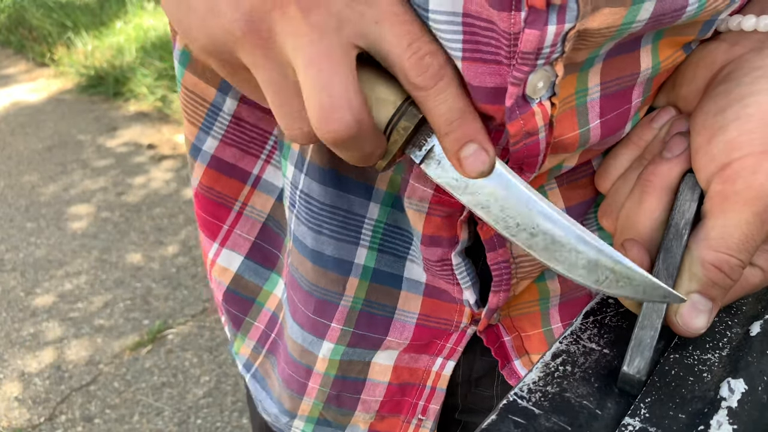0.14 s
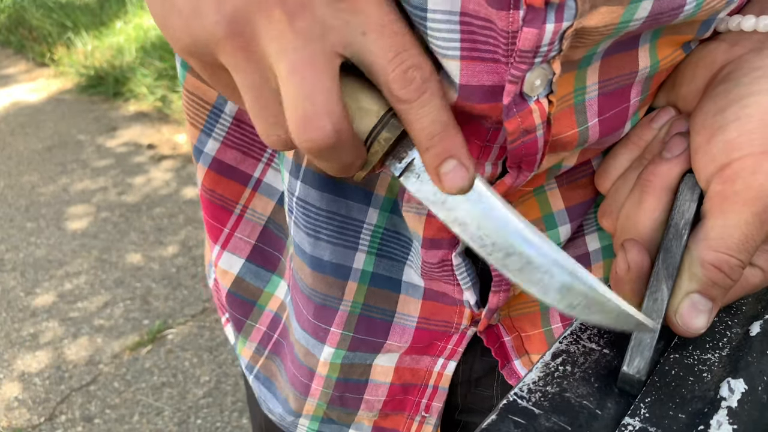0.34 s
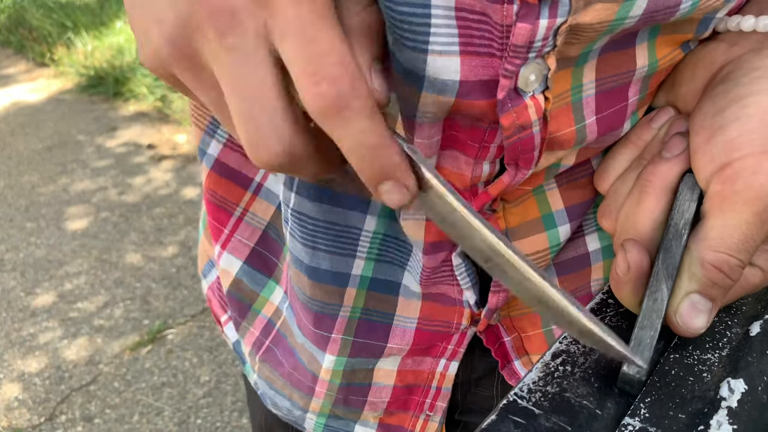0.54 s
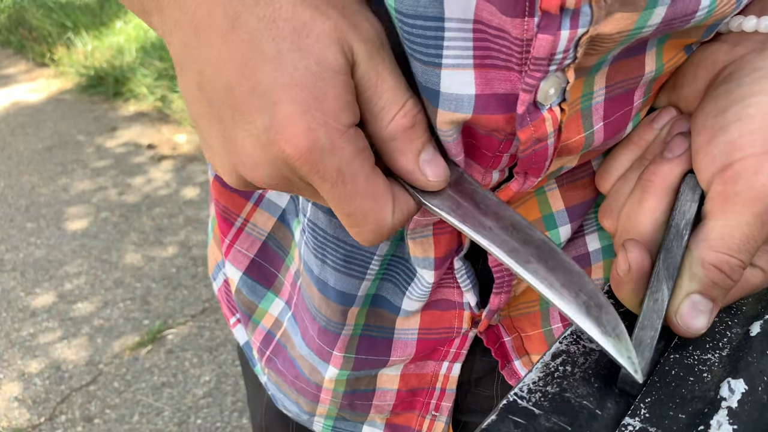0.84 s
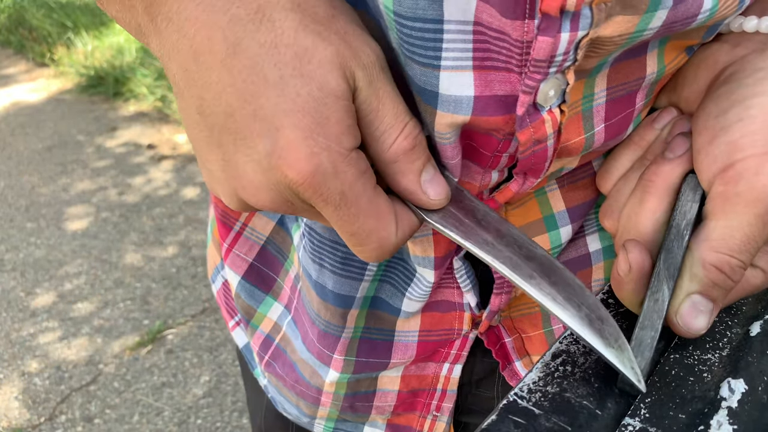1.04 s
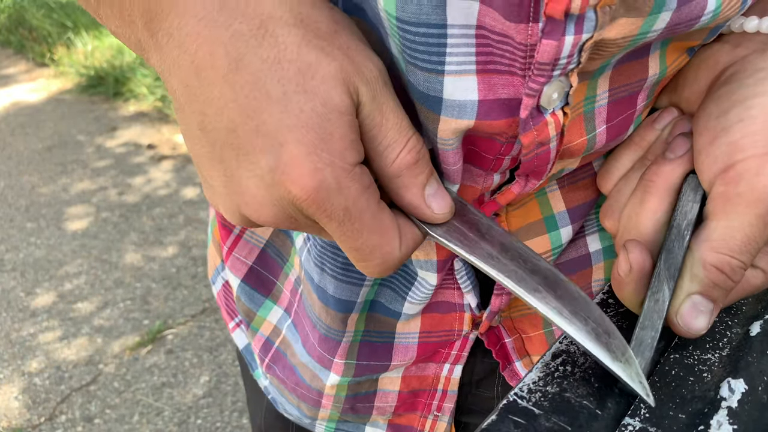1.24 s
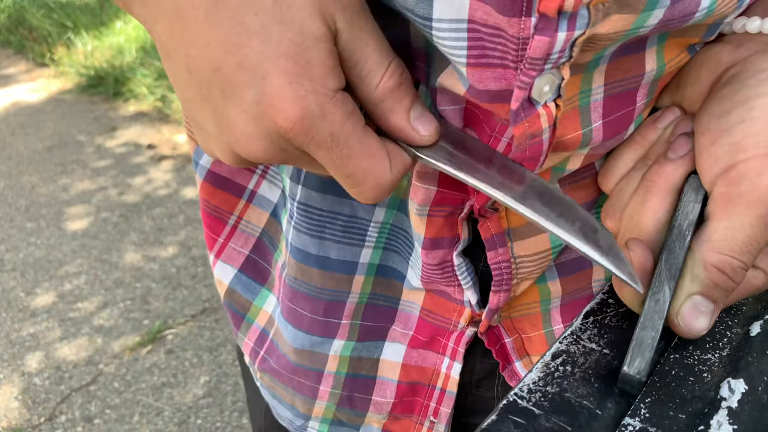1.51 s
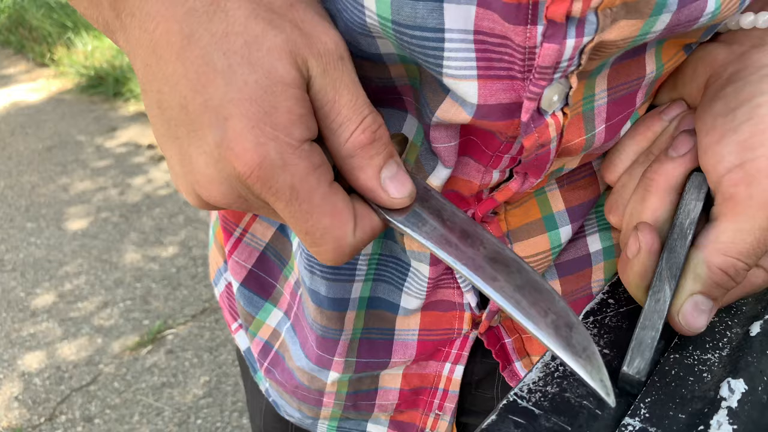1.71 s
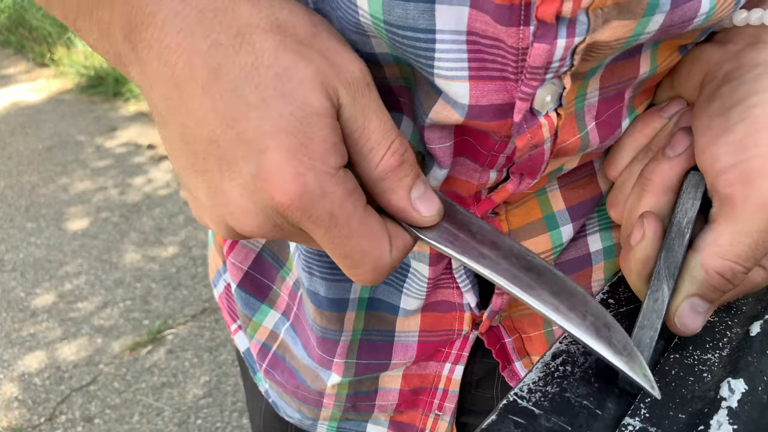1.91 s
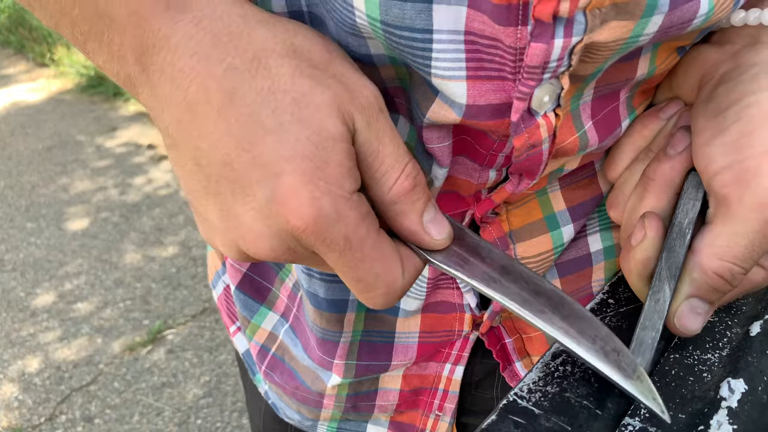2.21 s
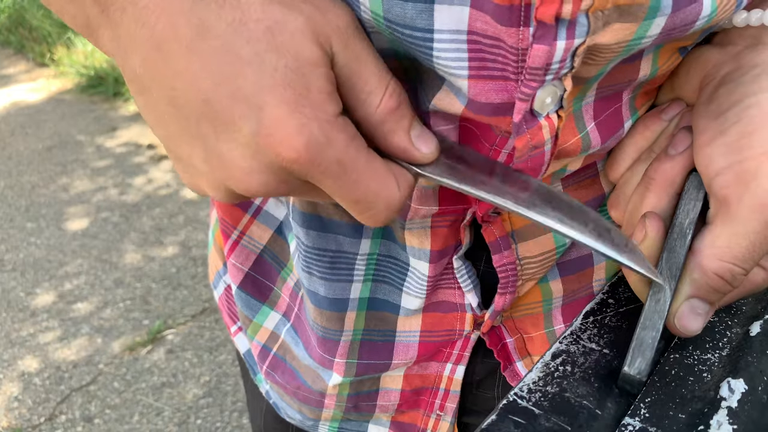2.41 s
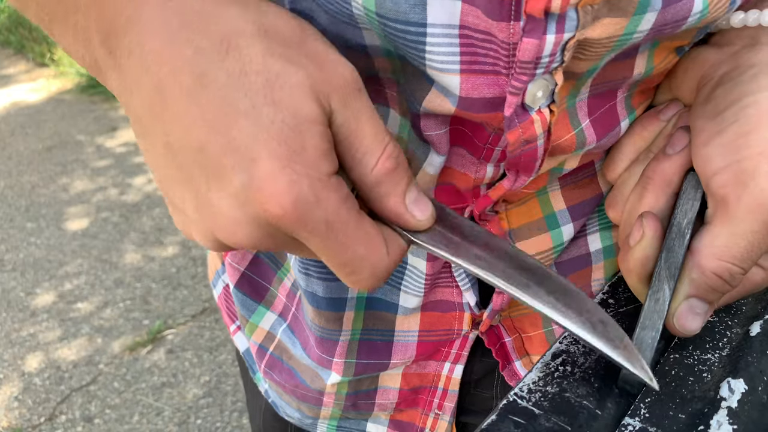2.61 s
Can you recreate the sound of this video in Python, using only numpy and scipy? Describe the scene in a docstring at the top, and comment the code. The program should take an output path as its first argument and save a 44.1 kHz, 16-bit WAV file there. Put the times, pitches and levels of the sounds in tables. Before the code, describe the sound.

A knife is sharpened on a small whetstone: three times the blade lands with a tap, then makes a short, gritty, slightly ringing scrape. Outdoors and close up, wind bumps the microphone over faint hiss and insects.

```python
"""Outdoors at a bench, a hand-held knife is set on a small whetstone with a tap, then pushed along it
in a short, gritty stroke, three times. Steel catching on grain sets blade and stone ringing briefly,
and the bench thuds underneath. Hand or blade brushes faintly and the grip creaks. Behind it sits a
bed of far hiss, motor hum and high, throbbing insects, while wind bumps the microphone."""
import sys
import numpy as np
from scipy import signal
from scipy.fft import rfft, irfft
from scipy.io import wavfile

SR = 44100
rng = np.random.default_rng(int(sys.argv[2]) if len(sys.argv) > 2 else 0)


def wav_out(sig):
    """Save sig, one row per channel (or a flat mono array), as 16-bit PCM at SR to the path in sys.argv[1]."""
    wavfile.write(sys.argv[1], SR, np.round(np.clip(np.atleast_2d(sig).T, -1, 1) * 32767).astype(np.int16))


N = 121275
T = np.arange(N) / SR
SHORT_T = T[:SR // 2]   # time within one contact or echo tail
PRE_ROLL_S = .01

# far hiss, with a silent band cut out at 10-12 kHz: f/Hz, level/dB
AIR_EQ = [(90, -49.5), (150, -2), (220, -13.5), (310, -20.5), (450, -15.5), (650, -22), (950, -28.5),
          (1400, -26.5), (1900, -25), (2350, -21), (2750, -23), (3300, -26.5), (4200, -26.5), (5500, -32),
          (6800, -35.5), (7300, -50), (8300, -8), (9500, -41.5), (10200, -123), (11200, -124), (12200, -84),
          (12900, -39), (14200, -49), (15000, -70), (15600, -65.0)]
# left-right likeness of hiss and wind: f/Hz, likeness/0-1
STEREO_LIKENESS = [(30, 1), (80, 0.84), (290, 0.98), (640, 0.66), (1400, 0.11), (8300, 0), (15000, 0.033)]
# wind rumble on the microphone: t/s, level/dB
RUMBLE_FADER = [(0.0, -50), (0.21, -50), (0.33, -50), (0.64, -52), (0.86, -53), (1.08, -53.5),
                (1.24, -48.5), (1.39, -47.5), (1.65, -51), (2.75, -54.5)]
# its tone: f/Hz, level/dB
RUMBLE_EQ = [(30, -28), (60, 1), (90, -0.5), (150, -8), (300, -19.5), (600, -77.5)]
# the deepest buffeting: t/s, level/dB
BUFFET_FADER = [(0.0, -63), (0.05, -54), (0.16, -57), (0.2, -63), (0.32, -52), (0.37, -82), (0.45, -58),
                (0.49, -64), (0.65, -43), (0.69, -50), (0.73, -45), (0.84, -39.5), (0.87, -44), (0.91, -45),
                (0.94, -40), (0.97, -51), (1.18, -57), (1.25, -41.5), (1.29, -64), (1.37, -42), (1.53, -51),
                (1.56, -43), (1.62, -79), (1.88, -53.5), (1.91, -52), (1.97, -51), (2.0, -53), (2.34, -64),
                (2.35, -50), (2.75, -63.5)]
# its tone: f/Hz, level/dB
BUFFET_EQ = [(10, -11), (28, 12.5), (48, 8), (80, -19), (200, -82)]
# single wind bumps: t/s, level/dB, f/Hz, signed gain
WIND_BUMPS = [(0.719, -30.5, 46.6, -1.1), (0.746, -28.5, 48, -1), (0.802, -23, 70, 0.92),
              (0.875, -29, 115, 0.97), (0.889, -26, 119, 0.59), (0.904, -26.5, 33.8, 0.86),
              (1.246, -32.5, 83.5, -1.26), (1.331, -31.5, 62.5, 1), (1.353, -22.5, 81, 0.98),
              (1.699, -35.5, 61.4, 0.79)]
# modes of blade and stone: f/Hz, level over the grit/dB, t60/s, pan left/dB, left phase lead/rad
BLADE_MODES = [(651, 3, 0.049, 14, 0), (768.7, 5.5, 0.089, -10, -2), (1440.7, 4.5, 0.067, 12.5, 2.5),
               (1575.5, 5, 0.046, -12, 3), (1746, 6.5, 0.047, 12, -1.5), (2180, 2, 0.079, 23.5, -4.5),
               (2314, 3, 0.047, 20.5, -1), (2393, -8, 0.11, 1, 1), (2495, 12, 0.05, 0, 2.5),
               (2633, 6.5, 0.045, 1, 2), (2800, 11.5, 0.052, -7.5, 3), (3466, 7, 0.034, -4, -1.4),
               (4270, 0.5, 0.083, -9, -2.5), (4450, 2, 0.022, 21, -0.1), (4922, 0.5, 0.034, 14.5, 0.23),
               (5510, 5, 0.032, -9, 4.56), (8150, 11.5, 0.035, -18, 0.6), (9260, 11.5, 0.012, -5.5, 1.08),
               (14100, 4, 0.011, -4, 2.5)]
# modes of the bench: f/Hz, relative level/dB, t60/s
BENCH_MODES = [(135.6, 1, 0.18), (185.5, -7.5, 0.19), (229, -5.5, 0.068), (320.6, -19.5, 0.05),
               (405.4, -16, 0.12), (557, -15, 0.15)]
# nearby echoes, band by band: f/Hz, t60/s
ECHO_DECAYS = [(300, 0.33), (800, 0.32), (1600, 0.15), (3000, 0.096), (6000, 0.027), (12000, 0.06)]
# the blade lands on the stone: t/s, level/dB, rattle t60/s, thud/dB, snap/dB, bounce delay/s
BLADE_TAPS = [(0.2036, -24, 0.017, -26, -40, 0.006), (1.152, -30, 0.017, -25.5, -43.5, .005),
              (2.28, -24, .018, -27, -70, 0.00783)]
# tone of the rattle, one curve a tap: f/Hz, level/dB
TAP_EQS = [
    [(150, -43), (300, -22), (420, -16.5), (680, 1), (850, -1.5), (1130, -9.5), (1450, 7.5), (1700, -17),
     (1920, -7.5), (2500, -5), (2800, -9), (3200, -17.5), (4200, -6.5), (5000, -3.5), (6300, -17),
     (7200, -34), (8100, -23), (9250, -21.5), (10300, -34.5), (11700, -44), (13000, -30), (14200, -40),
     (15100, -55), (15700, -67.5)],
    [(150, -22), (300, -2), (420, -11.5), (680, 3.5), (850, -2), (1130, -16), (1450, -10.5), (1700, -6),
     (1920, -16.5), (2500, -6), (2800, -10.5), (3200, -19), (4200, -18), (5000, -10.5), (6300, -15),
     (7200, -42), (8100, -41), (9250, -33), (10300, -26), (11700, -58.5), (13000, -52), (14200, -51.5),
     (15100, -59.0), (15700, -68.0)],
    [(150, -41.5), (300, -30), (420, -20), (680, -5), (850, 0.0), (1130, -12), (1450, -6.5), (1700, -5.5),
     (1920, -1.5), (2500, -12.5), (2800, -21), (3200, -33), (4200, -28.5), (5000, -31), (6300, -51.0),
     (7200, -48), (8100, -39), (9250, -39.0), (10300, -68.0), (11700, -54.0), (13000, -42), (14200, -43),
     (15100, -60), (15700, -73.5)],
]
# bright snap on top of a tap: f/Hz, level/dB
SNAP_EQ = [(3000, -54), (6000, -8), (9200, 32), (11500, -44), (13800, 10), (15500, -3)]
# pressure of the edge on the stone, one curve a stroke: t/s, level/dB
STROKE_FADERS = [
    [(0.365, -71), (.39, -49), (.41, -35), (.42, -30), (0.437, -28.5), (.449, -29), (.455, -48),
     (0.475, -61), (.5, -78)],
    [(1.395, -85), (1.418, -58), (1.43, -47.5), (1.453, -37), (1.465, -37.5), (1.476, -38.5), (1.485, -53),
     (1.5, -57.5), (1.535, -75)],
    [(2.365, -58.5), (2.39, -46.5), (2.4, -34.5), (2.412, -32), (2.43, -37.5), (2.447, -34), (2.456, -59),
     (2.475, -63), (2.5, -80)],
]
# tone of the grit, one curve a stroke: f/Hz, level/dB
STROKE_EQS = [
    [(150, -29), (300, -10.5), (420, -21), (680, -12), (850, -10.5), (1130, -17.5), (1450, -7), (1700, -5),
     (1920, -21), (2500, -4), (2800, -12.5), (3200, -14.5), (4200, -12), (5000, -9.5), (6300, -21.5),
     (7200, -27.5), (8100, -20), (9250, -26.5), (10300, -19.5), (11700, -37), (13000, -38), (14200, -27),
     (15100, -43), (15700, -37.0)],
    [(150, -48), (300, -28), (420, -17.5), (680, -10.5), (850, -6), (1130, -18.5), (1450, -10),
     (1700, -4.5), (1920, -14.0), (2500, -9), (2800, -1.5), (3200, -15), (4200, -17.5), (5000, -11.5),
     (6300, -13.5), (7200, -26.5), (8100, -30), (9250, -9), (10300, -17), (11700, -41), (13000, -25),
     (14200, -18), (15100, -24), (15700, -42.0)],
    [(150, -50), (300, -34), (420, -23.5), (680, -10), (850, 4), (1130, -16), (1450, -12.5), (1700, 2),
     (1920, -13.5), (2500, -2.5), (2800, -9), (3200, -18.5), (4200, -22), (5000, -17), (6300, -20.5),
     (7200, -33), (8100, -36), (9250, -17.5), (10300, -25), (11700, -45), (13000, -30), (14200, -27),
     (15100, -28), (15700, -42.0)],
]
# bench rumble under each stroke: level against the stroke/dB, delay/s
STROKE_RUMBLES = [(-4.5, 0.027), (0, 0.0522), (-13.5, 0.0092)]
# swishes of hand or blade: middle t/s, length/s, level/dB, f/Hz
SWISHES = [(.715, 0.068, -77, 9200), (1.93, 0.37, -68.5, 1880), (2.276, 0.023, -56, 2050)]
# ticks of the creaking grip: t/s, drive level/dB
GRIP_TICKS = [(1.8258, -57), (1.8587, -51.5), (1.872, -52), (1.8768, -48), (1.8875, -49), (1.8996, -50),
              (1.9104, -53), (1.9433, -47), (1.9503, -49), (1.9598, -46), (1.9764, -48), (1.9882, -48),
              (2.0027, -47.5), (2.0352, -50), (2.238, -53), (2.562, -58)]


def amp(db):
    """Decibels to gain."""
    return 10 ** (np.asarray(db) / 20)


def unit_rms(x):
    """Scale to rms 1."""
    return x / np.sqrt(np.mean(x ** 2) + 1e-20)


def at_hz(curve, hz):
    """Read a curve on a log-frequency axis."""
    freqs, values = np.transpose(curve)
    return np.interp(np.log(hz + 1), np.log(freqs), values)


def equalise(x, eq):
    """Shape a signal with an EQ curve in dB."""
    size = x.shape[-1]
    return irfft(rfft(x) * amp(at_hz(eq, np.arange(size // 2 + 1) * SR / size)), size)


def drift(hz):
    """Smooth random modulation, rms 1."""
    r = np.exp(-2 * np.pi * hz / SR)
    return unit_rms(signal.lfilter([1], [1, -2 * r, r * r], rng.standard_normal(N + SR))[SR:])


def ring(x, hz, t60, phase=0.):
    """A resonator: a unit click rings as a decaying sine of height 1."""
    r, w = amp(-60 / (t60 * SR)), 2 * np.pi * hz / SR
    return signal.lfilter([np.sin(phase), r * np.sin(w - phase)], [1, -2 * r * np.cos(w), r * r], x + 1e-18)


def wide_noise(eq):
    """Coloured stereo noise, centred in the bass and wide in the treble; rms 1."""
    mid, side = rfft(rng.standard_normal((2, N)))
    hz = np.arange(len(mid)) * SR / N
    alike = np.clip(at_hz(STEREO_LIKENESS, hz), 0, 1)
    stereo = np.sqrt(1 + alike) * mid + np.sqrt(1 - alike) * side * [[1], [-1]]
    return unit_rms(irfft(stereo * amp(at_hz(eq, hz)), N))


def pitched_noise(shape, hz, width_hz):
    """Noise sent twice through one resonance; rms 1."""
    t60 = np.log(1000) / (np.pi * width_hz)
    return unit_rms(ring(ring(rng.standard_normal(shape), hz, t60), hz, t60))


def air():
    """Far hiss with a slight waver in level and a silent band cut out at 10-12 kHz."""
    return amp(-59.5 + drift(hz=7.6)) * wide_noise(AIR_EQ)


def motor():
    """A far motor hums on one low, unsteady note."""
    return amp(-55.5) * pitched_noise(N, hz=104.5, width_hz=3.7)


def insects(throbs_per_s=17.6, peak_s=.98, depth_db=4.5, pan_right_db=6):
    """Insects shrill in a high band that throbs and flickers."""
    throb_db = depth_db * np.abs(np.cos(np.pi * throbs_per_s * (T - peak_s))) ** 7.5
    level_db = -68 + throb_db + 3.3 * drift(hz=40) + pan_right_db / 2 * np.array([[-1], [1]])
    return amp(level_db) * pitched_noise((2, N), hz=8354, width_hz=556)


def wind(gust_db=2.5, bump_cycles=4.44):
    """Wind hits the microphone: gusty rumble, deep buffeting and single low bumps."""
    rumble_db = np.interp(T, *np.transpose(RUMBLE_FADER)) + gust_db * drift(hz=12)
    out = amp(rumble_db) * wide_noise(RUMBLE_EQ)
    out += amp(np.interp(T, *np.transpose(BUFFET_FADER))) * wide_noise(BUFFET_EQ)
    for s, db, hz, gain in WIND_BUMPS:
        lowpass = signal.butter(2, 2 * hz, fs=SR, output="sos")
        puff = signal.sosfilt(lowpass, signal.unit_impulse(N, int(s * SR)))
        out += gain * amp(db) * ring(puff, hz, t60=bump_cycles / hz)
    return out


def grit(size, hits_per_s=12000, spread_db=3):
    """Dense random micro-impacts of steel on grain; rms 1."""
    hits = amp(spread_db * np.minimum(rng.exponential(1, size), 5)) * rng.choice([-1, 1], size)
    return unit_rms(hits * (rng.random(size) < hits_per_s / SR))


def mic_ports(x, hz=1410, width_hz=1520):
    """The left port hears the sound straight, the right with one band turned in phase."""
    r = np.exp(-np.pi * width_hz / SR)
    poles = [1, -2 * r * np.cos(2 * np.pi * hz / SR), r * r]
    return np.array([x, signal.lfilter(poles[::-1], poles, x)])


def contact(start_s, envelope, eq, thud, scatter_db=2.5):
    """Grit sounds directly and rings blade and stone; under the thud envelope it shakes the bench."""
    scrape = equalise(grit(len(envelope)) * envelope, eq)
    out = mic_ports(scrape)
    for hz, db, t60, pan_db, lead in BLADE_MODES:
        gain = amp(db + rng.normal(0, scatter_db)) * 2 * np.log(1000) / (t60 * SR)
        out[0] += gain * amp(pan_db / 2) * ring(scrape, hz, t60, lead)
        out[1] += gain * amp(-pan_db / 2) * ring(scrape, hz, t60)
    out *= np.sqrt(np.mean(envelope ** 2) / np.mean(out ** 2))   # the envelope sets the loudness
    bench = sum(amp(db) * unit_rms(ring(grit(len(thud)) * thud, hz, t60)) for hz, db, t60 in BENCH_MODES)
    out += bench * np.max(thud) / np.max(np.abs(bench))
    return np.pad(out, ((0, 0), (int(start_s * SR), N)))[:, :N]


def opening_ring(t60=.2):
    """The dull ring of an earlier stroke dies away as the scene opens."""
    decay = amp(-48 - 60 * SHORT_T / t60)
    return contact(0, decay, eq=[(400, 1), (1600, -8), (3000, -41)], thud=decay)


def echoes(x, send_db=-4):
    """Nearby echoes blur into a short tail that dies faster in the treble."""
    tail = 0
    for hz, t60 in ECHO_DECAYS:
        band = signal.butter(2, [hz / 1.5, hz * 1.4], "band", fs=SR, output="sos")
        wash = signal.sosfilt(band, rng.standard_normal((2, len(SHORT_T))))
        tail += wash * amp(-60 * SHORT_T / t60) / np.sqrt(t60)
    return amp(send_db) * signal.fftconvolve(x, tail / np.sqrt(SR / 14), axes=1)[:, :N]


def strike(t, t60, attack_s=.00092):
    """Envelope of a hit: sharp attack, exponential decay."""
    return np.clip(t / attack_s, 0, 1) * amp(-60 * t / t60)


def taps(settle_t60=.08, snap_t60=.014, thud_delay_s=.00733):
    """The blade lands with a bright snap, bounces once and settles; the bench thuds just after."""
    t, out = SHORT_T - PRE_ROLL_S, 0
    settle = amp(-19 - 60 * t / settle_t60) * (t > 0)
    for (s, db, t60, thud_db, snap_db, bounce_s), eq in zip(BLADE_TAPS, TAP_EQS):
        bounce = amp(-2.5) * strike(t - bounce_s, t60)
        rattle = amp(db) * (strike(t, t60) + bounce + settle)
        thud = amp(thud_db) * strike(t - thud_delay_s, t60)
        out += contact(s - PRE_ROLL_S, rattle, eq, thud)
        snap = amp(snap_db - 60 * np.clip(T - s, 0, 1) / snap_t60) * (T > s)
        out += snap * unit_rms(equalise(grit(N), SNAP_EQ))
    return out


def strokes(chatter_db=1.2, chatter_hz=180):
    """The edge is pushed along the stone, chattering on the grain while the bench rumbles."""
    out = 0
    for fader, eq, (rumble_db, delay_s) in zip(STROKE_FADERS, STROKE_EQS, STROKE_RUMBLES):
        times, levels = np.transpose(fader)
        start_s = times[0] - PRE_ROLL_S
        push_db = np.interp(SHORT_T + start_s, times, levels, left=-120, right=-120)
        push = amp(push_db + chatter_db * drift(chatter_hz)[:len(SHORT_T)])
        rumble = amp(rumble_db) * np.roll(push, int(delay_s * SR))
        out += contact(start_s, push, eq, rumble)
    return out


def brushes():
    """Hand or blade brushes lightly: soft swells of band-passed grit."""
    out = 0
    for s, length, db, hz in SWISHES:
        band = signal.butter(2, [hz / 1.3, hz * 1.3], "band", fs=SR, output="sos")
        swell = np.cos(np.pi * np.clip((T - s) / length, -.5, .5))
        out += amp(db) * swell * unit_rms(signal.sosfilt(band, [grit(N), grit(N)]))
    return out


def grip_creaks(modes_hz=(1460, 2140, 2660, 4050), t60=.0082):
    """The grip creaks in dry ticks, each a click through four damped resonances."""
    clicks = np.zeros(N)
    times, levels = np.transpose(GRIP_TICKS)
    clicks[(times * SR).astype(int)] = amp(levels) / 2
    ticks = sum(ring(clicks, hz, t60) * 1500 / hz for hz in modes_hz)
    return np.array([ticks, np.roll(ticks, 3)])   # the right side lags a hair


def scene():
    """Knife work up close over a bed of wind, hiss, motor and insects."""
    knife = strokes() + taps() + opening_ring()
    return knife + echoes(knife) + grip_creaks() + brushes() + wind() + air() + motor() + insects()


def record(dry, cutoff_hz=15250):
    """A steep low-pass takes off the very top."""
    return signal.sosfilt(signal.ellip(10, .5, 60, cutoff_hz, fs=SR, output="sos"), dry)


dry = scene()
out = record(dry)
wav_out(out)
```